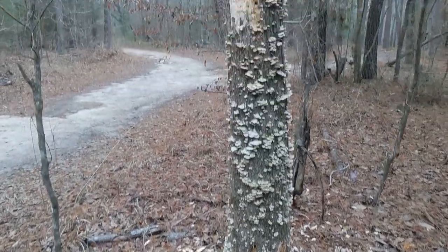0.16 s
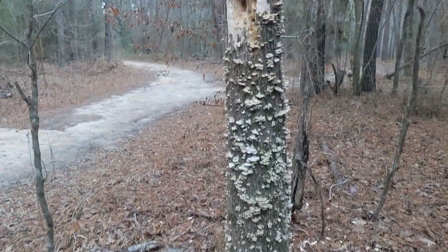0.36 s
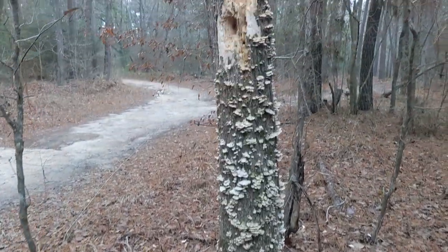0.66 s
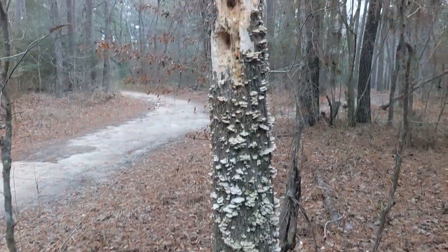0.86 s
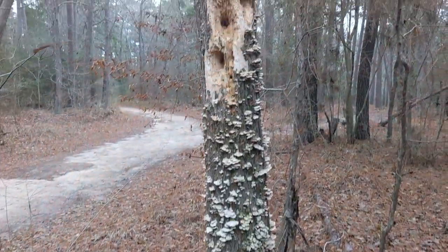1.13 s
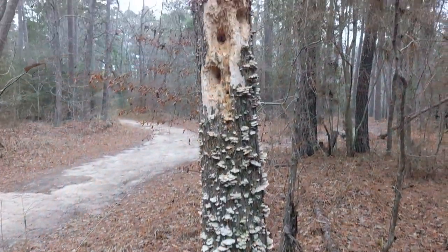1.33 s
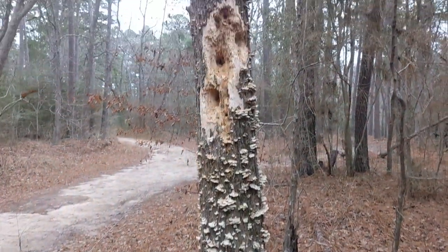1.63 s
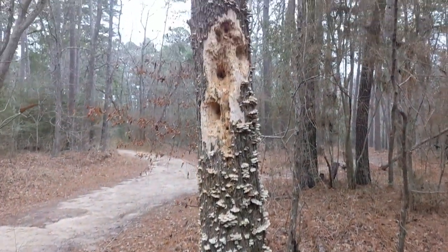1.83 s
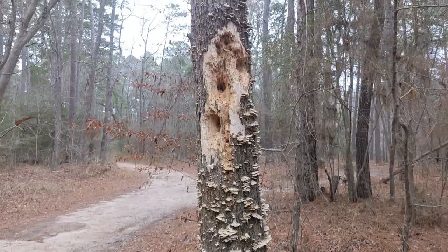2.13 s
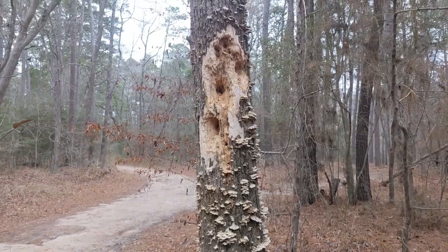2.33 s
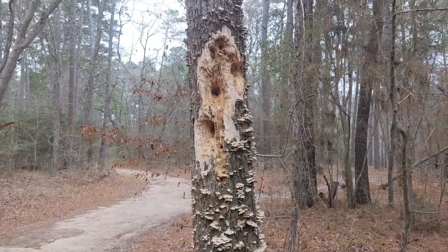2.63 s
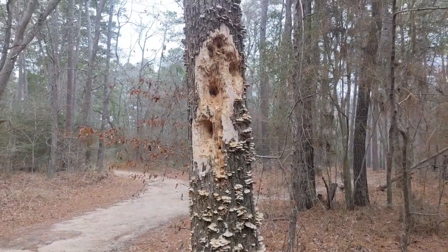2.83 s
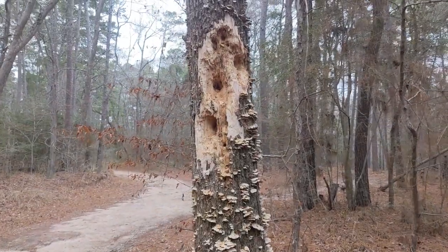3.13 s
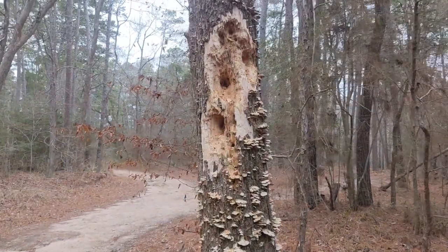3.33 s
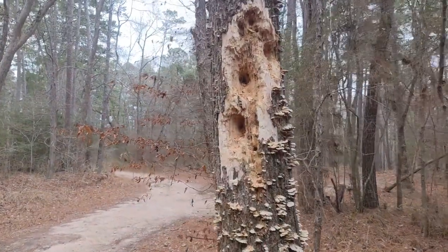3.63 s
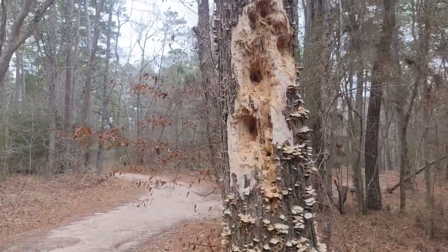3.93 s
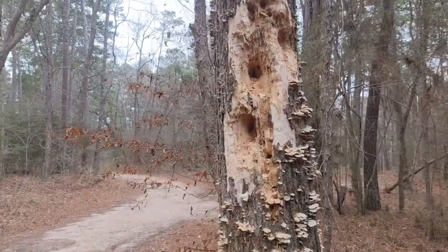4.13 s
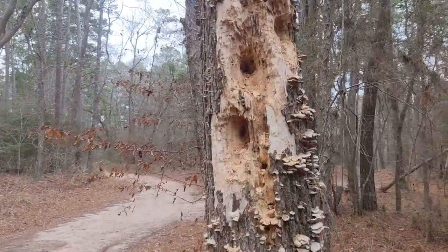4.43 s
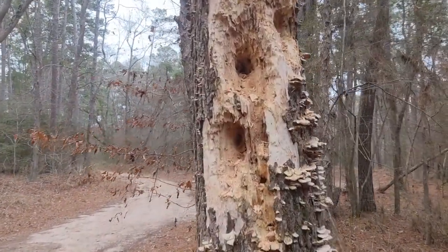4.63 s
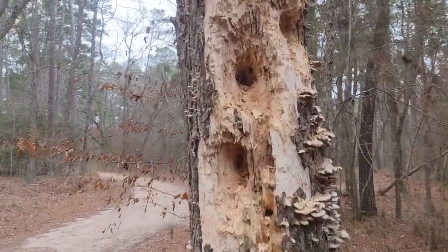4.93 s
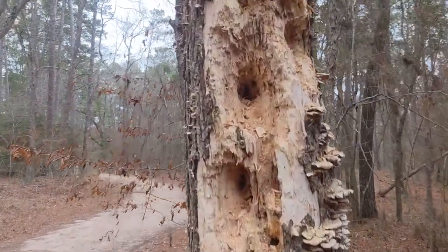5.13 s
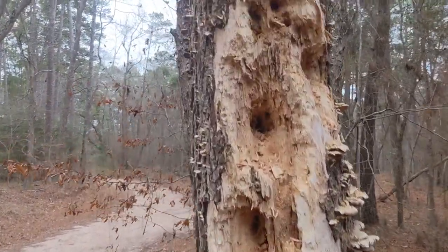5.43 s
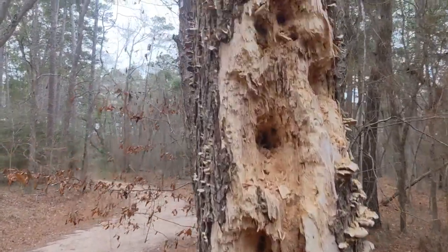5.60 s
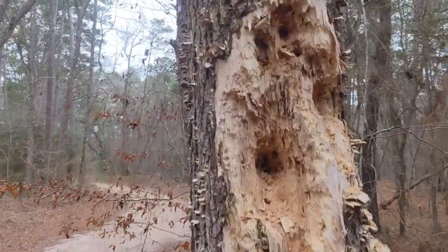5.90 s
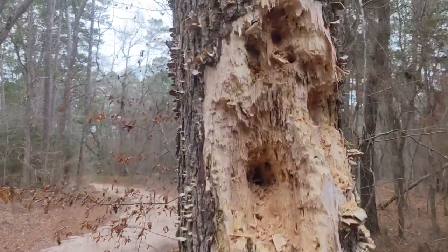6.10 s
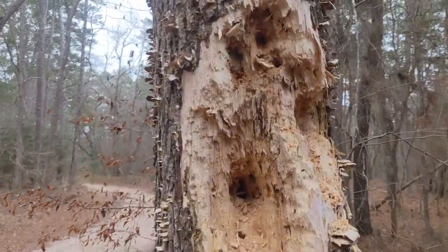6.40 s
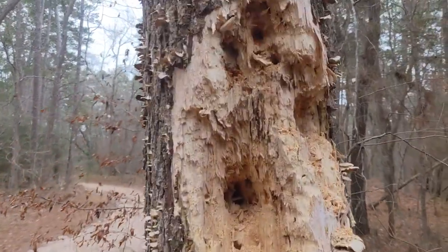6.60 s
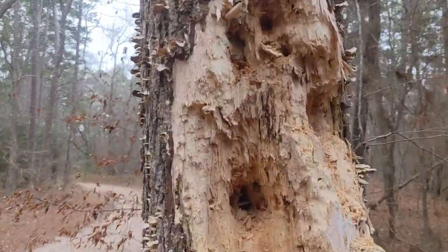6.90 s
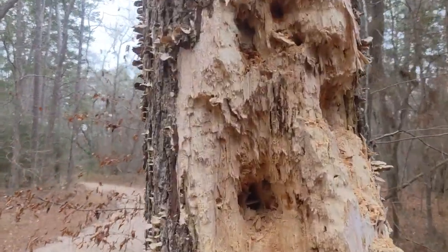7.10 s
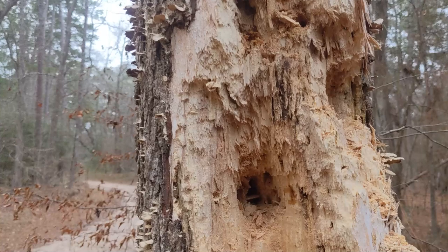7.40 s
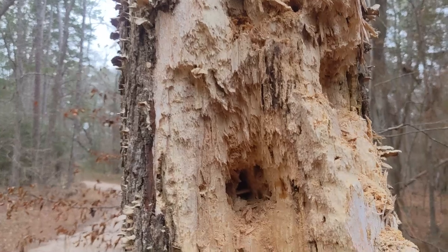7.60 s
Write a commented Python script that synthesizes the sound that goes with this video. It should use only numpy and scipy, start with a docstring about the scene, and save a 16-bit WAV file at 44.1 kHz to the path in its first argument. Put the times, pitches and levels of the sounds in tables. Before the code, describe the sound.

Dry leaf litter crackles in irregular bursts underfoot, a cluster of twigs cracks loudly, then rustling fades into hushed forest air.

```python
"""Slow steps through dry leaves in a quiet wood.
Each step shears the top leaves (grains of filtered noise in a bright crackle) and crushes the litter below;
brittle stalks tick and twigs snap (noise bursts with short rings), and the ground knocks and thuds (decaying sines).
Trunks scatter a faint answer (decaying noise as echo) over the air's low murmur and faint tones (shaped noise)."""
import sys
import numpy as np
from scipy import signal
from scipy.fft import rfft, irfft, next_fast_len
from scipy.io import wavfile
from scipy.ndimage import map_coordinates

SR = 44100
rng = np.random.default_rng(int(sys.argv[2]) if len(sys.argv) > 2 else 0)


def materialize(psi):
    """Save the field psi as 16-bit PCM at rate SR to the path in sys.argv[1].

    A 1-D psi becomes a single channel; in a 2-D psi each row is a channel.
    """
    bounded = np.clip(np.atleast_2d(psi).T, -1, 1)
    quanta = np.round(bounded * 32767).astype(np.int16)
    wavfile.write(sys.argv[1], SR, quanta)


N = 341775
TIME = np.arange(N) / SR

# bright spectrum with a peak near 14 kHz, shared by stalks and twigs: (frequency [Hz], relative level [dB])
BREAK_SPECTRUM = [(300, -27), (2000, -26), (5000, -15), (7500, -11.5), (11000, -7.5), (14000, 0.5),
                  (17000, -3)]


def amp(db):
    """Decibels to gain."""
    return 10 ** (np.asarray(db) / 20)


def unit(x):
    """Scale x to rms 1."""
    return x / np.sqrt(np.mean(x ** 2) + 1e-20)


def decay(t, t60):
    """Exponential fade that falls by 60 dB in t60 seconds."""
    return np.exp(-np.log(1000) * t / t60)


def along(points, hz):
    """Read (frequency [Hz], value) points on a log frequency axis."""
    f, value = np.transpose(points)
    return np.interp(np.log(hz + 1), np.log(f), value)


def wobble(rate):
    """A smooth random curve with rate knots a second."""
    knots = rng.standard_normal(int(N * rate / SR) + 4)
    return map_coordinates(knots, [TIME * rate])


def colour(x, spectrum):
    """Filter x with the given spectrum; minimum phase keeps the onset sharp."""
    m = 2 * next_fast_len(len(x))
    gain = amp(along(spectrum, np.fft.rfftfreq(m, 1 / SR)))
    # folding the cepstrum onto positive times makes the filter causal
    cepstrum = irfft(np.log(gain))
    cepstrum[1:m // 2] *= 2
    cepstrum[m // 2 + 1:] = 0
    response = np.exp(rfft(cepstrum))
    return irfft(rfft(x, m) * response, m)[:len(x)]


def resonate(x, hz, q):
    """Pass x through one resonance."""
    b, a = signal.iirpeak(hz, q, SR)
    return signal.lfilter(b, a, x)


def add(track, s, sound):
    """Mix a sound into the track at time s."""
    part = track[max(round(s * SR), 0):][:len(sound)]
    part += sound[:len(part)]


def hit(x, db):
    """Scale a blow so that the rms of its first three milliseconds has the given level."""
    head = x[:round(.003 * SR)]
    return amp(db) * x / np.sqrt(np.mean(head ** 2))


def tread():
    """Levels of crackle and crush [dB]: each push grazes, swells, eases and lets go, then the leaves settle."""
    # a foot pushes through the litter:
    # (start [s], length [s], crackle of the top leaves [dB], crush of the layer below [dB re crackle])
    pushes = [(0.0, 0.17, -65, -12), (0.189, 0.097, -54.5, -15), (.295, 0.068, -50, -17),
              (.405, 0.037, -43.5, -18.5), (0.451, .08, -48, -17.5), (.54, 0.049, -43.5, -19.5),
              (.595, 0.038, -42, -13.5), (0.775, 0.16, -58, -15.5), (1.152, 0.31, -66, -13),
              (1.739, 0.02, -61, -24), (1.888, 0.16, -70, -11.5), (2.636, 0.073, -57, -16.5),
              (2.723, 0.051, -54, -16.5), (2.911, .09, -57, -16), (3.167, 0.13, -50.5, -17.5),
              (3.309, .075, -42.5, -8.5), (3.412, 0.21, -48.5, -12.5), (3.661, 0.055, -49, -11),
              (3.782, 0.23, -60.5, -13), (4.075, 0.024, -56.5, -16.5), (4.19, .2, -65.5, -10.5),
              (4.444, 0.042, -50, -11.5), (4.52, 0.23, -56.5, -9.5), (4.791, 0.13, -55.5, -14),
              (5.029, 0.013, -64, -9.5), (5.228, 0.035, -48, -13), (5.309, .25, -56, -13.5),
              (5.618, 0.041, -50, -12), (5.835, .035, -44.5, -20), (5.872, .024, -44.5, -5.5),
              (6.501, 0.47, -72, -9), (6.968, 0.23, -67, -11.5), (7.322, 0.024, -66.5, -16),
              (7.486, 0.044, -69, -12)]
    rise, sag, fall = 305, 8, 290  # dB per second
    brush_db, brush_rate = -13, 130  # the sole grazes the top leaves before it bears down (dB, dB/s)
    settle_db, settle_rate = -18, 60  # bent leaves creep back afterwards (dB, dB/s)
    rest_db, rest_crush_db = -81, -88  # the litter under a standing foot

    t = TIME[::32]
    crackle_power, crush_power = amp(rest_db) ** 2, amp(rest_crush_db) ** 2
    for start, length, db, crush_re_crackle_db in pushes:
        before = np.maximum(start - t, 0)
        after = np.maximum(t - start - length, 0)
        attack = np.maximum(-rise * before, brush_db - brush_rate * before)
        release = np.maximum(-fall * after, settle_db - settle_rate * after)
        level = db + attack - sag * np.clip(t - start, 0, length) + release
        crackle_power = crackle_power + amp(level) ** 2
        crush_power = crush_power + amp(level + crush_re_crackle_db) ** 2
    return [np.interp(TIME, t, 10 * np.log10(p)) for p in (crackle_power, crush_power)]


def grains(density, spread_db, t60, q, count):
    """A stream of tiny breaks of uneven size, shared among leaves that each ring in their own way."""
    t = np.arange(SR // 100) / SR
    out = np.zeros(N)
    for _ in range(count):
        at = np.flatnonzero(rng.random(N) < density / count / SR)
        size = amp(spread_db * np.minimum(rng.standard_normal(len(at)), 2))
        breaks = np.zeros(N)
        breaks[at] = size * rng.choice([-1, 1], len(at))
        burst = rng.standard_normal(len(t)) * decay(t, t60)
        leaf = burst + 2 * resonate(burst, rng.uniform(2130, 16300), q)
        out += signal.oaconvolve(breaks, unit(leaf))[:N]
    # a denser stream gets finer grain, not a higher level
    return unit(out / np.sqrt(density))


def leaves(crackle_db, crush_db):
    """The harder the foot presses, the more leaves break each second, until they merge into a hiss."""
    # spectra of the sheared top leaves and the crushed layer below: (frequency [Hz], relative level [dB])
    crackle_spectrum = [(300, -65.5), (2000, -28), (5000, -19), (7500, -12), (10000, -9), (12000, -4.5),
                        (13500, 0), (14500, 4.5), (15800, -9), (18000, -6)]
    crush_spectrum = [(70, -40), (150, -4.5), (350, 0.5), (700, 0.5), (1300, -1.5), (2500, -1.5),
                      (4500, -1), (7000, -5), (12000, -39)]
    density = 380 * amp(.75 * (crackle_db + 60))  # breaks per second
    breaks = grains(density, spread_db=1.5, t60=0.0055, q=5.7, count=24)
    clumps = amp(1.2 * wobble(80))  # the sole catches and slips
    crumbs = grains(density / 2, spread_db=-1.5, t60=0.01, q=3.8, count=6)  # coarser breaks deeper down
    # noise stands for the breaks too fine to tell apart
    top = unit(colour(breaks + 1.13 * rng.standard_normal(N), crackle_spectrum))
    below = unit(colour(breaks + 0.52 * crumbs + .5 * rng.standard_normal(N), crush_spectrum))
    return clumps * (amp(crackle_db + 0.18) * top + amp(crush_db + 1.03) * below)


def fracture(t60, scatter_db, scatter_t60):
    """A sudden break: a spike and a short burst, followed by its scatter off the litter all around."""
    t = np.arange(SR // 10) / SR
    envelope = decay(t, t60) + amp(scatter_db) * decay(t, scatter_t60)
    x = rng.standard_normal(len(t)) * envelope
    x[0] += 3.5
    return x


def strays(crackle_db, count):
    """Lesser stalks give way at random, more often and louder as the rustle grows: rows like the near ones."""
    tick_base_db, follow, scatter_db, body_re_tick_db = -60, 0.54, 3, -14.5  # follow: dB per dB of rustle
    crowding = .25  # dB of likelihood per dB of rustle
    low_hz, high_hz = 7400, 15550  # most ring near the top of this range

    when, pitch, size, body = rng.random((count, 4)).T
    rustle_db = crackle_db - np.median(crackle_db)
    chance = np.cumsum(amp(crowding * rustle_db))
    s = np.interp(when, chance / chance[-1], TIME)
    tick_db = tick_base_db + follow * np.interp(s, TIME, rustle_db) + scatter_db * (2 * size - 1)
    body_db = tick_db + body_re_tick_db + scatter_db * (2 * body - 1)
    hz = high_hz - pitch ** 2 * (high_hz - low_hz)
    return list(zip(s, tick_db, body_db, hz))


def stalks(crackle_db):
    """Each stalk gives one sharp tick: a brief ring at its own pitch, a splintery edge and a duller body."""
    # the nearest stalks giving way:
    # (time [s], tick level before the trims of its parts [dB], duller body level [dB], ring pitch [Hz])
    near_stalks = [(0.3031, -38.5, -68, 13170), (0.4954, -38.5, -53, 13760), (0.572, -36.5, -69, 14640),
                   (.642, -34, -51, 13480), (0.6663, -44.5, -75, 14060), (0.7617, -44.5, -58.5, 13120),
                   (0.8759, -43.5, -57.5, 14050), (0.9292, -41.5, -55.5, 12100),
                   (1.0535, -54.5, -67.5, 13560), (1.1122, -53, -67, 13460), (1.39, -52, -76, 13950),
                   (1.8562, -59, -69.5, 12400), (1.891, -55, -80.5, 14650), (2.243, -53, -69.5, 14900),
                   (2.5288, -57.5, -84.5, 14070), (3.6465, -34.5, -58.5, 13890), (4.359, -52, -66, 13100),
                   (4.481, -43, -62.5, 13420), (4.5297, -45, -58, 14270), (5.4092, -37.5, -74, 14480),
                   (5.4618, -37.5, -57.5, 13150), (5.4965, -46, -66, 14960), (5.5915, -43.5, -60, 14950),
                   (6.087, -57.5, -66.5, 11630), (6.1371, -53, -68.5, 13750), (6.335, -53, -65, 14240),
                   (7.1379, -57, -76, 9600), (7.337, -56, -64.5, 6900), (7.3525, -48.5, -63, 14100),
                   (7.5031, -52, -71, 14550), (7.5317, -56, -71, 14100), (7.5783, -58, -67.5, 11850)]
    # spectrum of the duller body: (frequency [Hz], relative level [dB])
    body_spectrum = [(200, -28.5), (700, 2.5), (1600, -2.5), (3500, 0), (6000, 2.5), (9000, -12.5),
                     (14000, -36.5)]
    out, t = np.zeros(N), np.arange(SR // 10) / SR
    for s, tick_db, body_db, hz in near_stalks + strays(crackle_db, count=110):
        ring = np.sin(2 * np.pi * hz * t) * t * decay(t, 0.0026)
        splinter = fracture(t60=0.00098, scatter_db=-8.5, scatter_t60=0.043)
        edge = resonate(colour(splinter, BREAK_SPECTRUM), hz, q=2.0)
        body = colour(fracture(t60=0.0026, scatter_db=-8.5, scatter_t60=0.03), body_spectrum)
        add(out, s, hit(ring, tick_db - 3) + hit(edge, tick_db - 0.5) + hit(body, body_db))
    return out


def twigs():
    """A twig snaps with a bright crack; its halves ring briefly and splinters rattle around that pitch."""
    # twigs breaking:
    # (time [s], crack level [dB], wood level before the trims of its parts [dB], wood resonance [Hz])
    snaps = [(1.311, -69.5, -67.5, 1410), (1.561, -82, -65, 1594), (1.571, -79, -69.5, 1900),
             (2.0128, -51, -59.5, 1270), (2.0801, -55, -62, 5640), (2.1874, -48.5, -63, 5450),
             (3.2007, -29.5, -44, 1244), (3.225, -27, -42, 1201), (3.2297, -23.5, -44, 1394),
             (3.242, -29, -46, 2010), (3.2958, -30, -55, 6460), (3.303, -19.5, -31.5, 3700),
             (3.3659, -41, -43, 1408), (3.423, -52, -53, 2220), (3.5093, -34, -41, 1483),
             (3.5234, -26.5, -36, 2980), (3.6601, -20.5, -27.5, 1902), (3.664, -45, -40, 1693),
             (3.6872, -40, -44, 1470), (4.6914, -37, -44.5, 2800), (4.825, -59, -58, 2707),
             (5.991, -69.5, -60, 3215)]
    out, t = np.zeros(N), np.arange(SR // 10) / SR
    for s, crack_db, wood_db, hz in snaps:
        crack = colour(fracture(t60=0.012, scatter_db=-14.5, scatter_t60=0.08), BREAK_SPECTRUM)
        splinters = resonate(fracture(t60=0.0057, scatter_db=-9.5, scatter_t60=0.083), hz, q=1)
        ring = np.sin(2 * np.pi * hz * t) * decay(t, 0.0067)
        add(out, s, hit(crack, crack_db) + hit(splinters, wood_db - 5) + hit(ring, wood_db - 7))
    return out


def knocks():
    """Wood pressed into the soft ground: a heavily damped knock that leaves a short low ring."""
    # dull knocks under the sole: (time [s], level before the low cut [dB], pitch [Hz])
    blows = [(3.304, -46.5, 383), (3.3093, -42, 393), (3.5232, -46, 800), (3.5235, -44.5, 334.5),
             (3.661, -45, 490), (3.6866, -44, 414.7), (4.691, -40, 596.2)]
    out, t = np.zeros(N), np.arange(SR // 10) / SR
    for s, db, hz in blows:
        add(out, s, hit(np.sin(2 * np.pi * hz * t) * decay(t, 0.0098), db))
    low_edge_hz = 135  # the knocks keep little below this; the deep thuds sound separately
    low_cut = signal.cheby1(6, 1, low_edge_hz, "high", fs=SR, output="sos")
    return signal.sosfilt(low_cut, out)


def thuds():
    """The soil gives under the heel and swings for a few cycles."""
    # the full weight of a step reaching the soil: (time [s], level before the envelope [dB], pitch [Hz])
    footfalls = [(3.525, -56, 60.9), (3.665, -52, 136.5), (4.695, -64, 146.4)]
    out, t = np.zeros(N), np.arange(SR // 4) / SR
    envelope = (1 - np.exp(-t / 0.0014)) * decay(t, 0.107)
    for s, db, hz in footfalls:
        add(out, s, amp(db) * np.sin(2 * np.pi * hz * t) * envelope)
    return out


def forest(x):
    """Trunks scatter the sound back; each frequency dies at its own speed."""
    # the answer of the trunks: (frequency [Hz], 60 dB decay time [s])
    decay_times = [(150, 0.37), (1500, 0.087), (6000, 0.508), (15000, 0.39)]
    hz, t, noise = signal.stft(rng.standard_normal(SR // 2), SR, nperseg=256)
    fading = noise * decay(t, along(decay_times, hz)[:, None])
    tail = signal.istft(fading, SR, nperseg=256)[1]
    return signal.fftconvolve(x, tail / np.linalg.norm(tail))[:N]


def air():
    """A wavering low murmur over a steady rumble and faint hiss, all of it shaped noise."""
    # murmur of the air in the wood: (time [s], level before trim and wavering [dB])
    murmur_levels = [(0.0, -77.5), (.5, -71), (.8, -71.5), (1.1, -80), (1.73, -73), (2.42, -84.5),
                     (2.65, -71.5), (4.06, -73.5), (4.35, -77), (5.44, -71), (5.65, -77), (6.2, -75.5),
                     (7.29, -82), (7.75, -75.5)]
    # spectra of the murmur and of the steady rumble and hiss: (frequency [Hz], relative level [dB])
    murmur_spectrum = [(60, -28.5), (170, -8.5), (280, 1), (430, -3.5), (650, -7), (880, -5), (1200, -12),
                       (2200, -14.5), (5000, -25.5)]
    hush_spectrum = [(15, 2), (35, -1), (62, 0), (105, -8.5), (200, -12.5), (600, -13.5), (1500, -35.5),
                     (5000, -26), (10000, -28), (14000, -20.5), (17000, -35.5)]
    murmur_db = np.interp(TIME, *np.transpose(murmur_levels)) + 1.0 + 0.51 * wobble(9.9)
    murmur = amp(murmur_db) * unit(colour(rng.standard_normal(N), murmur_spectrum))
    hush = amp(-72.5) * unit(colour(rng.standard_normal(N), hush_spectrum))
    return murmur + hush


def tones():
    """Narrow bands of noise, each through two equal resonances, fade in and out at the edge of hearing."""
    # faint fuzzy tones from far off:
    # (start [s], end [s], pitch [Hz], width of each resonance [Hz], level before the fades [dB])
    far_tones = [(.12, 0.979, 284.5, 54.56, -77), (1.098, 2.154, 275, 49.96, -79.5),
                 (1.419, 2.079, 8400, 503, -88), (2.65, 3.298, 284.5, 50.1, -80),
                 (5.947, 6.55, 258, 59.8, -82.5), (6.082, 6.447, 799, 60.2, -82)]
    out = np.zeros(N)
    for start, end, hz, width_hz, db in far_tones:
        fade = np.clip(np.minimum(TIME - start, end - TIME) / 0.05, 0, 1)
        q = hz / width_hz
        band = resonate(resonate(rng.standard_normal(N), hz, q), hz, q)
        out += amp(db) * fade * unit(band)
    return out


def scene():
    """The steps, their echo among the trunks, the air and the far tones."""
    crackle_db, crush_db = tread()
    steps = leaves(crackle_db, crush_db) + stalks(crackle_db) + twigs() + knocks() + thuds()
    return (steps + amp(-15.0) * forest(steps) + air() + tones())[None]


def record(dry):
    """Keep nothing above a band limit, with a narrow sloping edge."""
    top_hz, edge_hz = 16000, 300  # centre and width of the edge
    m = next_fast_len(N + SR // 2)
    gain = np.clip((top_hz - np.fft.rfftfreq(m, 1 / SR)) / edge_hz + .5, 0, 1)
    return irfft(rfft(dry, m) * gain, m)[:, :N]


dry = scene()
out = record(dry)
materialize(out)
```